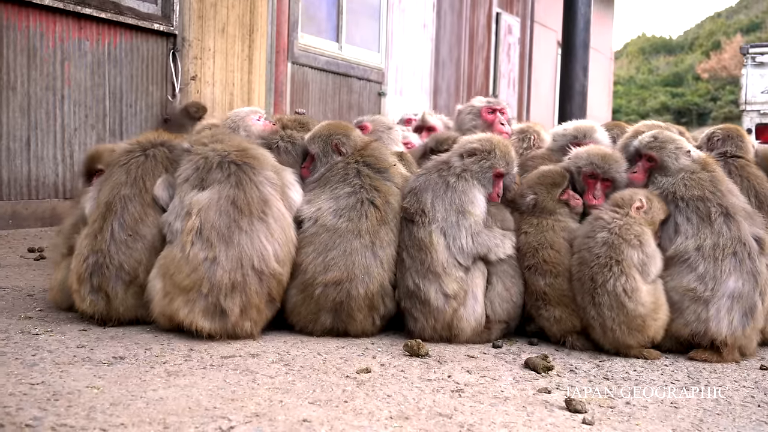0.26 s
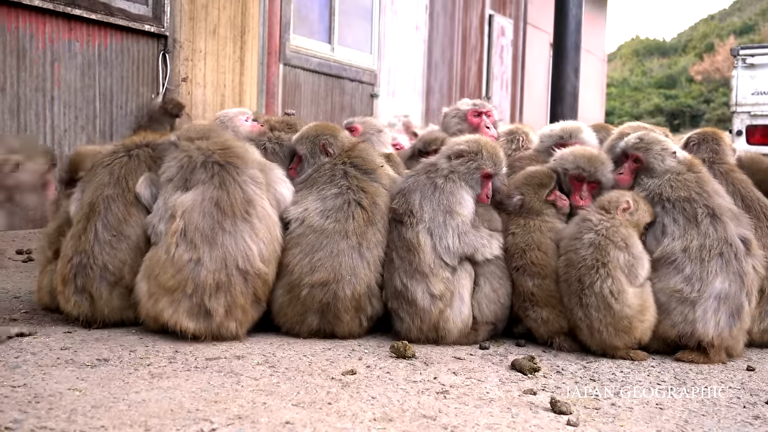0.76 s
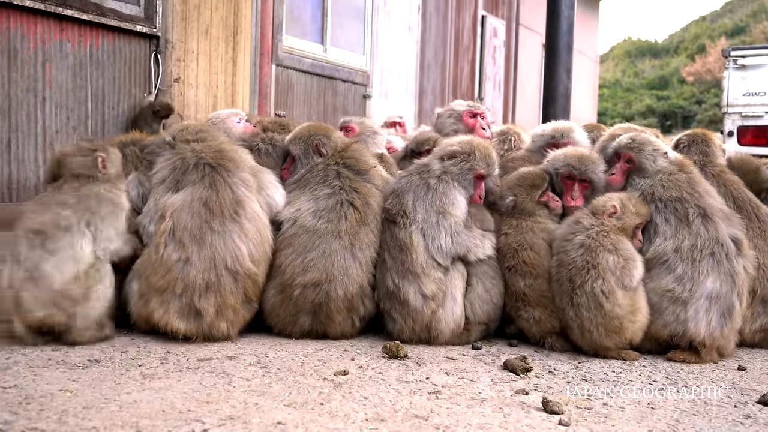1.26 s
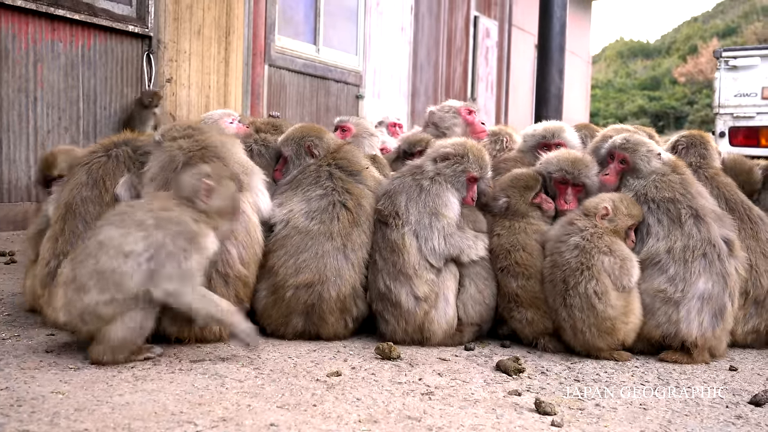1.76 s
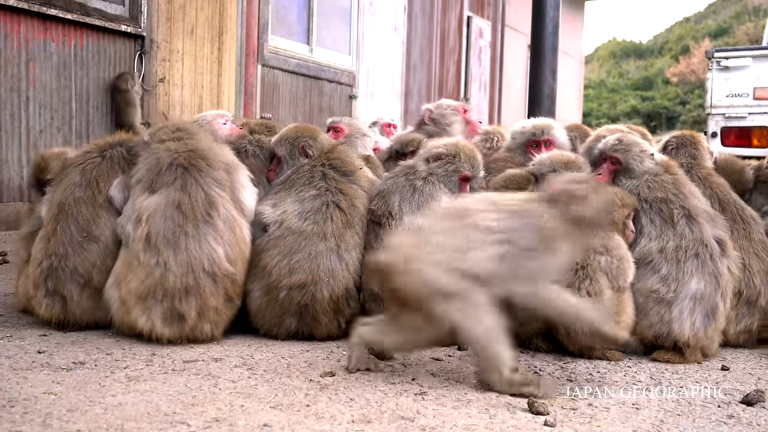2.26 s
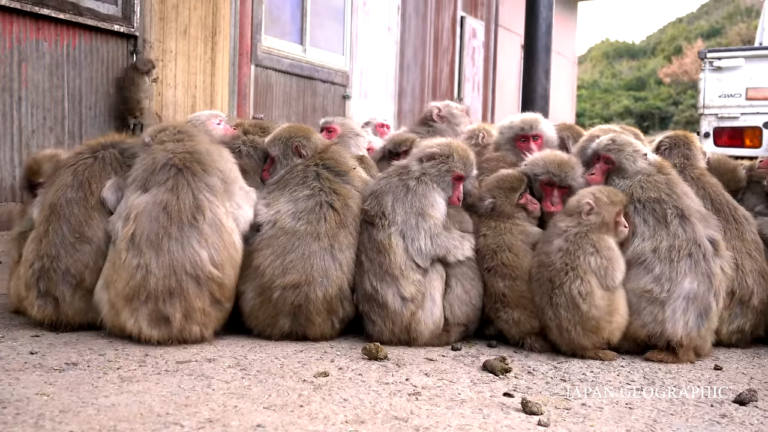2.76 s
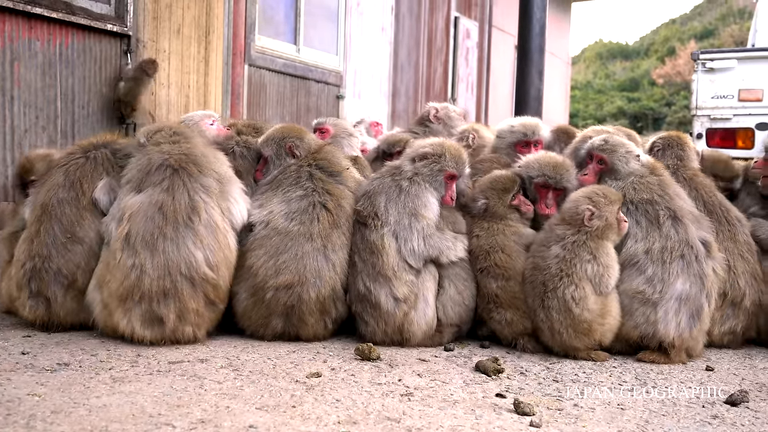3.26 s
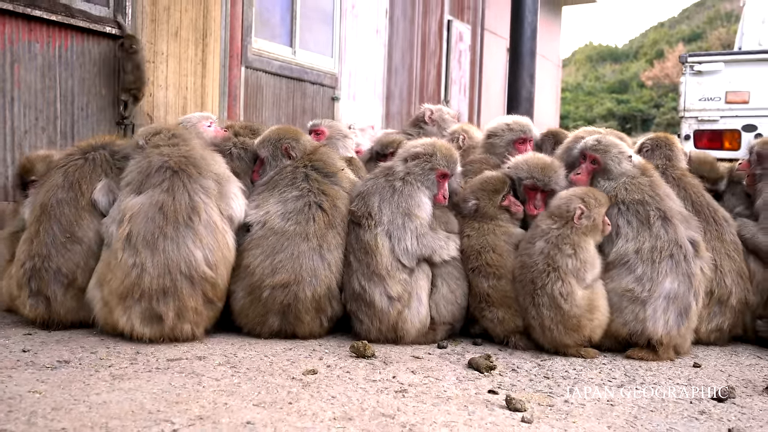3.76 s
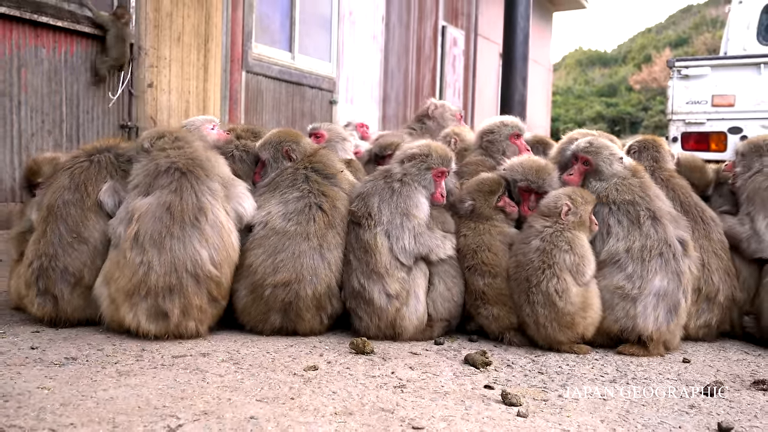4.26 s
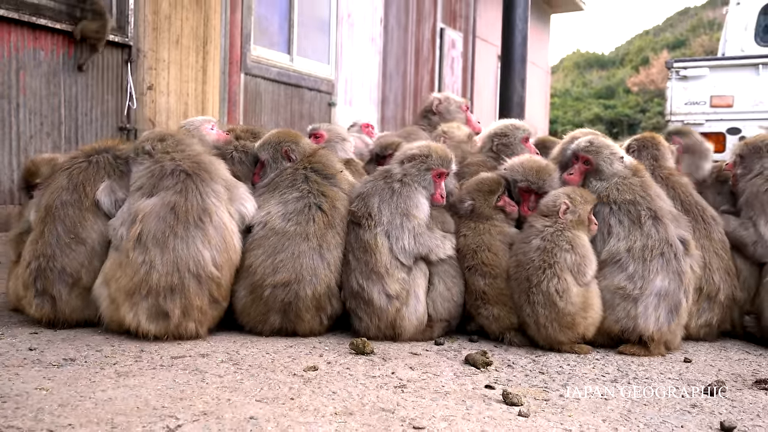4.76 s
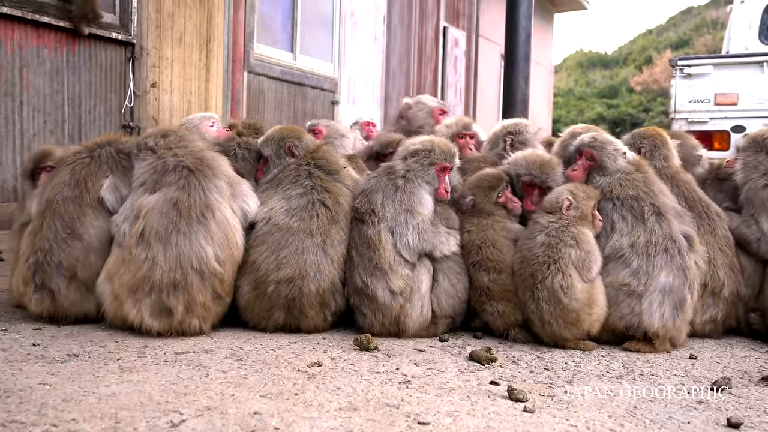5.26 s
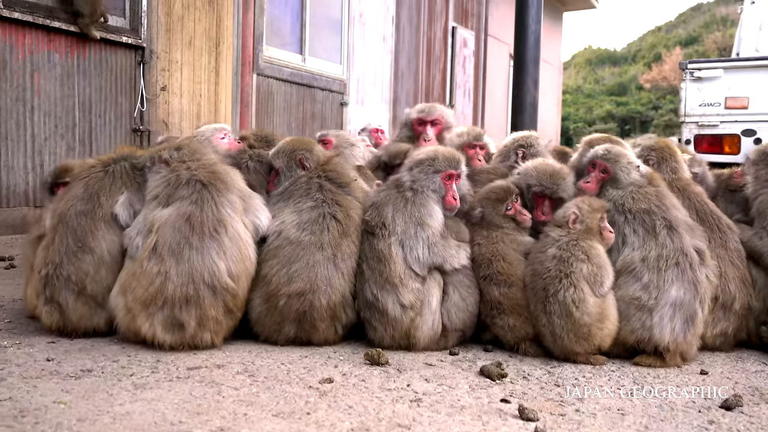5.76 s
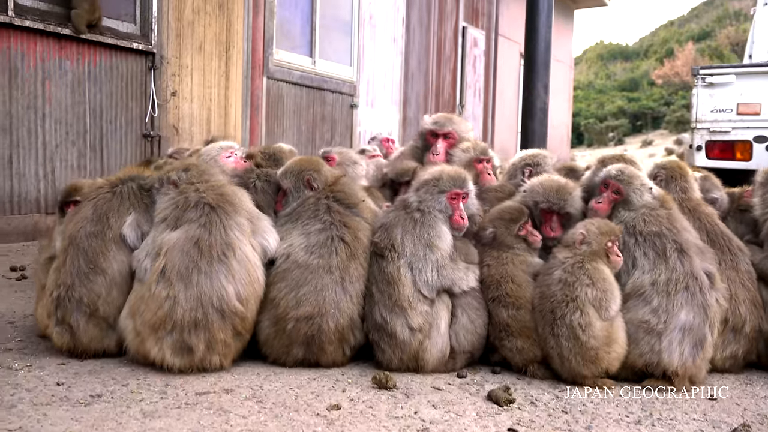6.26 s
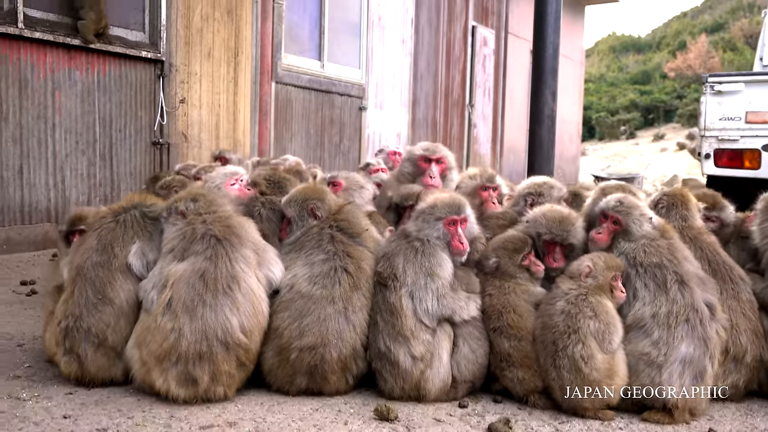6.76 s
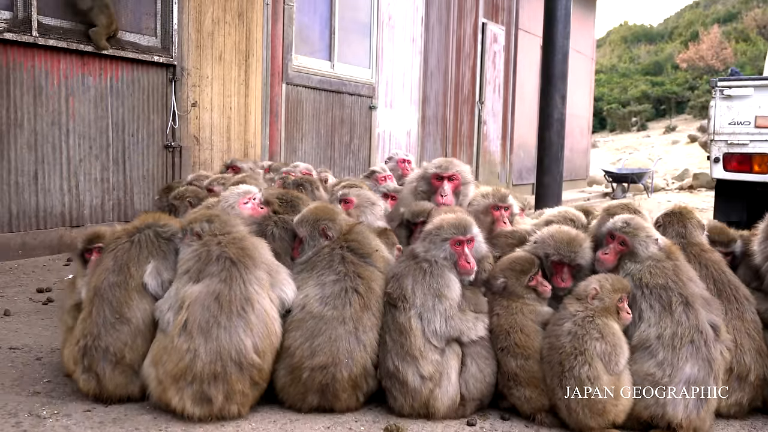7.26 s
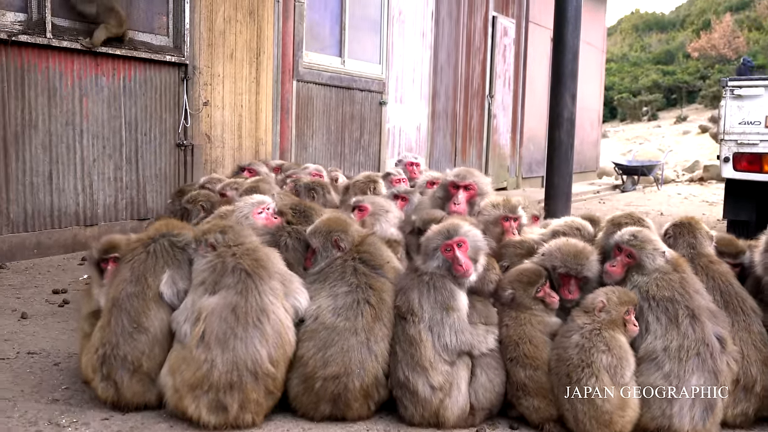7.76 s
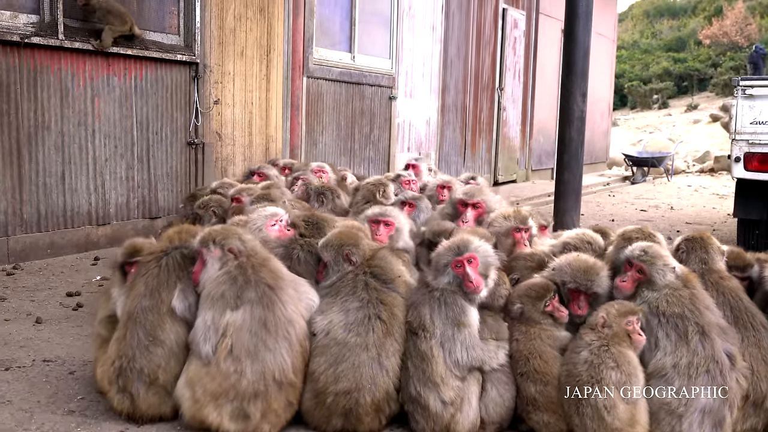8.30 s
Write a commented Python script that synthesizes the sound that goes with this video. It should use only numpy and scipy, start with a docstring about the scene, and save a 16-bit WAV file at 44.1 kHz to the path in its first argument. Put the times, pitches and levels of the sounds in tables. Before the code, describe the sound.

A troop of monkeys gives short high squeaks, chirps, hoarse rasps and a few loud screams outdoors, with two knocks and scattered clicks.

```python
"""On hard ground beside a sheet-metal wall, a huddle of macaques calls a few steps away.
Vibrating vocal folds give high whistles, squeals and screams; slack folds and turbulent breath excite
the mouth's resonances in hoarse rasps. Boards knock twice, feet scuff and gravel ticks.
Wall and yard reflect a short wash, wind rumbles on the two microphone ports,
and the loudest screams overload the input."""
import sys
import numpy as np
from scipy import signal
from scipy.fft import rfft, irfft, next_fast_len
from scipy.io import wavfile

SR = 44100
rng = np.random.default_rng(int(sys.argv[2]) if len(sys.argv) > 2 else 0)


def inscribe(sig):
    """Save sig as 16-bit PCM at rate SR to the path in sys.argv[1].

    A 1-D sig is mono; a 2-D sig holds one channel per row.
    Samples are clipped to [-1, 1] before scaling.
    """
    pcm = np.round(np.clip(np.atleast_2d(sig).T, -1, 1) * 32767)
    wavfile.write(sys.argv[1], SR, pcm.astype(np.int16))


N = 376173

# Irregularity of the vocal folds, by voice name: (roughness [0-1])
ROUGHNESS = {"clear": .1, "husky": .3, "hoarse": .45, "harsh": .62}
# Short calls: (time [s], length [s], first pitch [Hz], last pitch [Hz], fundamental's peak level [dB],
# second partial above the first [dB], fall per further partial [dB], voice)
CHIRPS = [(0, 0.082, 2620, 2562, -27.5, -12, 4, "harsh"), (0.116, 0.031, 1182, 971, -14, -40, 16, "hoarse"),
          (0.702, 0.066, 514, 604, -44, -8, -2, "husky"), (.775, 0.11, 531, 513, -40.5, -13.5, -5, "husky"),
          (0.939, 0.038, 344, 365, -41, 2, 17, "clear"), (1.067, 0.17, 796, 755, -50, -9, 4, "hoarse"),
          (1.274, 0.1, 673, 722, -48, -21, 7, "hoarse"), (1.439, 0.028, 350, 369, -43.5, 3, 8, "clear"),
          (1.703, 0.036, 686, 720, -49, 4, -0.5, "husky"), (1.805, 0.025, 631, 628, -52.5, 7, -3, "husky"),
          (1.927, 0.014, 609, 630, -47.5, 1.5, -2.5, "husky"),
          (2.051, 0.032, 277, 272, -38.5, -20, -2.5, "clear"),
          (2.508, 0.053, 3454, 3310, -26.5, -1.5, 7.5, "husky"),
          (2.584, 0.059, 3980, 4180, -38.5, -5.5, 19, "husky"),
          (2.793, 0.029, 2860, 2550, -17.5, -25.5, 2, "husky"),
          (2.985, 0.038, 1585, 1526, -40, -16, 4, "clear"),
          (3.144, 0.029, 1312, 1036, -25, -10, 1.5, "husky"),
          (3.148, 0.099, 5580, 3550, -25, -13, 19, "harsh"),
          (3.166, 0.055, 3320, 3100, -21.5, -25, 0, "hoarse"),
          (3.257, 0.047, 3730, 3310, -19.5, -9.5, 24, "hoarse"),
          (3.427, 0.039, 3720, 3680, -18, -25, 7, "harsh"),
          (3.637, 0.054, 397, 342.4, -36, -10, -1, "husky"),
          (3.999, 0.028, 1385, 1252, -34, -1, 2.5, "hoarse"),
          (4.189, 0.053, 4610, 4250, -23.5, -3.5, 8, "hoarse"),
          (4.433, 0.058, 4420, 4130, -29, -4.5, 4, "hoarse"),
          (5.201, 0.032, 1412, 1044, -41.5, 5, 19, "harsh"),
          (5.592, 0.042, 2320, 1810, -37, -13, 2, "husky"),
          (5.788, 0.023, 2002, 1828, -8.5, -5, 13.5, "husky"),
          (5.825, 0.049, 3215, 3355, -9, -29, 7, "harsh"),
          (6.829, 0.041, 1686, 1625, -45, 22.5, 31, "clear"),
          (6.927, 0.068, 4900, 4720, -39, 8.5, 4, "hoarse"),
          (7.007, 0.018, 2450, 3220, -15, -17, 29, "clear"),
          (7.036, 0.042, 1924, 940, -16.5, -1, 3, "harsh"),
          (7.839, 0.057, 1425, 1520, -43.5, -1, 12.5, "clear"),
          (8.246, 0.054, 1399, 934, -16.5, -2.5, 2.5, "harsh")]
# Long calls: (voice, clean start [s], second partial above the first [dB], fall per further partial [dB],
# contour of (time [s], pitch [Hz], fundamental's level [dB]))
SQUEALS = [ ("husky", 0, -6.5, 1.4, [(3.497, 4400, -25.5), (3.528, 4520, -18), (3.538, 4330, -22),
           (3.55, 4630, -15.5), (3.586, 4630, -22), (3.596, 5040, -19)]),
           ("husky", 0, -2.5, 5.8, [(3.735, 4620, -26), (3.76, 4870, -21), (3.79, 4760, -24),
           (3.82, 4510, -23), (3.85, 4690, -31), (3.895, 4660, -33), (3.93, 4830, -33),
           (3.965, 4680, -33.5), (4.01, 4370, -25.5), (4.04, 4280, -27)]),
           ("harsh", 0, -14.5, 6.9, [(4.599, 4060, -37), (4.615, 3450, -24.5), (4.665, 3350, -30.5)]),
           ("harsh", 0, -13, 7.1, [(4.703, 4200, -35), (4.72, 3500, -22), (4.745, 3250, -30)]),
           ("hoarse", 0, -19, 9, [(5.808, 2147, -1), (5.83, 2315, -6), (5.87, 2372, -1.5),
           (5.897, 2083, -8.5), (5.93, 2330, -5.5)]), ("hoarse", .09, -14, 1, [(6.212, 2393, -15),
           (6.23, 2300, -6), (6.278, 2355, 2.5), (6.3, 2770, -7), (6.312, 3260, -12), (6.35, 3330, -14),
           (6.385, 2932, -25), (6.41, 2780, -21), (6.427, 2572, -18), (6.446, 2920, -18.5),
           (6.462, 3250, -20), (6.482, 3130, -18), (6.502, 2850, -22), (6.52, 2375, -13),
           (6.527, 1970, -20.5), (6.535, 990, -30)]), ("hoarse", .012, -17, 13, [(7.022, 2838, -9.5),
           (7.04, 2730, -10), (7.067, 2045, -14.5), (7.086, 2180, -10)]),
           ("clear", 0, -18.5, 3.2, [(7.898, 1515, -38), (8.04, 1560, -30.5), (8.2, 1508, -31),
           (8.36, 1423, -32.5), (8.42, 1323, -23), (8.47, 1343, -35.5), (8.51, 1255, -32)]),
           ("hoarse", 0.029, -20, 6.8, [(8.204, 1900, -10), (8.212, 2112, -11.5), (8.232, 2012, -6),
           (8.26, 2060, -7), (8.29, 1684, -8)])]
def voices():
    """Periodic fold vibration gives a harmonic series; irregularity modulates pitch and amplitude."""
    tear_s, clean_share, torn_loss_db, top_fall_db = .01, .6, 6, 4
    out = np.zeros(N)
    flutter = wobble(250)
    quaver = wobble(152) + 0.605 * wobble(26.6)
    waver_db = 5 * wobble(30)
    chirps = [(voice, 0, second, fall, chirp_contour(*shape)) for *shape, second, fall, voice in CHIRPS]
    for voice, clean_s, second_above_db, fall_db, contour in chirps + SQUEALS:
        start, end = contour[0][0], contour[-1][0]
        t = np.arange(round((end - start) * SR)) / SR
        at = (start * SR + np.arange(len(t))).astype(int) % N
        torn = np.clip(1 + (t - clean_s) / tear_s, 0, 1)   # a clean start tears into roughness
        rough = ROUGHNESS[voice] * np.clip(t / .08, .6, 1) * np.maximum(torn, clean_share)
        pitch, first_db = curve(contour, t + start)
        second_db = first_db + second_above_db - torn_loss_db * (torn - torn[0])
        phase = 2 * np.pi * np.cumsum(pitch * (1 + .042 * rough * quaver[at])) / SR
        call = from_db(first_db) * np.sin(phase)
        for k in range(2, 9):   # each upper partial wavers on its own
            partial_db = second_db - fall_db * (k - 2) - top_fall_db * max(k - 3, 0)
            gain = from_db(partial_db + np.sqrt(rough) * waver_db[at - 3000 * k])
            jitter = .7 * k * rough * flutter[at - 50 * k]
            call += gain * np.sin(k * phase + jitter) * (k * pitch < .42 * SR)
        shimmer = np.sqrt(1 - rough ** 2) + rough * flutter[at]
        add(out, np.sqrt(2) * call * shimmer * edges(t, rise_s=0.0012, fall_s=0.0028), start)
    return out


def chirp_contour(start, length, first_hz, last_hz, peak_db):
    """Frequency glide under a parabolic swell: rows of (time [s], pitch [Hz], level [dB])."""
    progress, loudest_at = np.linspace(0, 1, num=9), 0.72
    pitch = last_hz + (first_hz - last_hz) * (1 - progress) ** 1.2
    level_db = peak_db - (2 * (progress - loudest_at)) ** 2
    return np.transpose([start + length * progress, pitch, level_db])


# Hoarse breaths: (time [s], hold [s], mouth resonance [Hz], level [dB], hiss relative to mouth [dB])
RASPS = [(0, 0.029, 2820, -17.5, -42), (0.119, 0.019, 1370, -17.5, -32), (0.305, 0.085, 3520, -25.5, -8.5),
         (0.597, 0.031, 3490, -25, -5), (0.702, 0.22, 3600, -29.5, -1.5), (1.063, 0.25, 3770, -24, -4),
         (1.318, 0.075, 3630, -26, -7.5), (1.693, 0.033, 3650, -40.5, -3.5), (1.802, 0.013, 3360, -34.5, 0),
         (1.922, 0.013, 3000, -33, -9), (2.516, 0.055, 3420, -24.5, -5), (2.858, 0.057, 3660, -29, -3.5),
         (2.952, 0.049, 3670, -28, -5.5), (3.165, 0.035, 3240, -18.5, -2), (3.26, 0.033, 3160, -25, -22),
         (3.397, 0.048, 3570, -24, -3), (3.495, 0.15, 3710, -25.5, -4.5), (3.683, 0.15, 3630, -27, 0),
         (3.851, 0.088, 3750, -30, -18), (4.159, 0.099, 3760, -31, -11), (4.336, 0.15, 3540, -30, -5),
         (4.591, 0.032, 3540, -32.5, -8), (4.705, 0.045, 3320, -31.5, -11), (4.944, 0.0089, 3330, -51, 5),
         (5.198, 0.03, 2620, -39.5, 3.5), (5.584, 0.053, 3350, -24, -0.5), (5.711, 0.061, 3450, -27, -5),
         (5.8, 0.12, 2210, -13.5, -29.5), (5.977, 0.053, 3250, -26, -5), (6.306, 0.051, 2950, -12.5, -5.5),
         (6.443, 0.032, 2630, -17.5, -12.5), (6.709, 0.0053, 3200, -31, -2.5),
         (6.818, 0.053, 3130, -37, 10.5), (6.992, 0.026, 3160, -21.5, -6),
         (7.027, 0.041, 3960, -16.5, -11.5), (7.72, 0.022, 3200, -26.5, -2.5),
         (7.898, 0.053, 3100, -29.5, -1), (8.016, 0.028, 3280, -32.5, 1.5), (8.122, 0.03, 3200, -30, -3),
         (8.227, 0.011, 1650, -2, -48), (8.234, 0.076, 3300, -18, -25)]
def rasps():
    """Source and filter: uneven slaps of slack folds, and the air between them, ring the mouth."""
    slap_hz = 580
    out = np.zeros(N)
    tension_db = wobble(4)
    slaps = pulses(slap_hz * from_db(tension_db + 1.5 * wobble(400))) * from_db(rng.standard_normal(N))
    puffs = passed(slaps, 480, "low", order=1)   # air escapes just after each slap
    air = 0.4 * rms_one(slaps) + rms_one(rng.standard_normal(N) * (puffs + 0.8 * puffs.mean()))
    hiss = teeth_hiss(slaps)
    beats = pulses(slap_hz * from_db(tension_db + 0.54 * wobble(150)))   # a steadier chest voice
    grunt = from_db(-44.5) * rms_one(passed(beats, [450, 2200], "band"))
    waver = from_db(1.5 * wobble(25))
    sides_db = -9 + 2.5 * np.array([wobble(12), wobble(12)])   # the lips vary two side resonances
    shifts = rng.uniform(.95, 1.05, len(RASPS))
    for shift, (start, held, hz, level_db, hiss_db) in zip(shifts, RASPS):
        length = held + 0.13
        first, size = round(start * SR), round(length * SR)
        t, span = np.arange(size) / SR, slice(first, first + size)
        breath = air[span]
        opening, closing = resonance(breath, 0.99 * hz, 170), resonance(breath, shift * hz, 260)
        formant = opening + (closing - opening) * t / length   # shifts as the mouth moves
        sides = sum(from_db(side_db[span]) * resonance(breath, ratio * hz, width_hz=300)
                    for side_db, ratio in zip(sides_db, (.87, 1.2)))
        mouth = rms_one(passed(formant + sides, 0.8 * hz, "high", order=3))
        effort = from_db(level_db + rasp_effort_db(t, held)) * waver[span]
        chest = grunt[span] * decay(t, t60_s=.5)
        rasp = effort * (mouth + from_db(hiss_db) * hiss[span]) + chest
        add(out, rasp * edges(t, rise_s=0.0046, fall_s=0.11), start)
    return out


def teeth_hiss(slaps):
    """Turbulence: a jet at the teeth is filtered by hollows of the mouth that open and close."""
    jet = rng.standard_normal(N) + .5 * rms_one(slaps)
    treble = passed(jet, 4300, "high") + .7 * passed(jet, [7000, 14000], "band")
    hiss = rms_one(treble + .7 * resonance(jet, 4700, width_hz=1800))
    hollows_hz = np.geomspace(2900, 15000, num=11)
    return rms_one(sum((-1) ** k * resonance(hiss, hz, hz / 7) * from_db(2.5 * wobble(9))
                       for k, hz in enumerate(hollows_hz)))


def rasp_effort_db(t, held):
    """Amplitude envelope of a breath: a short swell, a slow sag, a quick release after the hold."""
    swell_db, swell_s, sag_db_per_s, release_db_per_s = 5, 0.041, 51.5, 401
    onset_db = swell_db * (np.clip(t / swell_s, 0, 1) - 1)
    return onset_db - sag_db_per_s * t - release_db_per_s * np.maximum(t - held, 0)


# Blows on loose boards: (time [s], level [dB], board resonance [Hz], relative crack level [dB])
KNOCKS = [(2.301, -18, 660, -32), (2.731, -13, 1460, -16.5)]
def knocks():
    """Impact excitation: a sharp crack, and a damped rattle around the board's resonance."""
    out, t = np.zeros(N), np.arange(SR // 4) / SR
    for start, level_db, hz, crack_db in KNOCKS:
        board = rms_one(resonance(grains(len(t), spread_db=10.4), hz, width_hz=hz))
        rattle = passed(board, 3 * hz, "low") * decay(t, t60_s=0.11)
        crack = passed(rng.standard_normal(len(t)), 1500, "high") * decay(t, t60_s=0.18)
        add(out, from_db(level_db) * (rattle + from_db(crack_db) * crack), start)
    return out


# Feet on the ground: (time [s], relative level [dB])
SCUFFS = [(3.45, -52), (3.559, -42), (3.739, -44.5), (4.155, -42), (4.205, -37), (4.399, -32.5),
          (4.455, -30.5), (4.609, -31), (5.21, -41.5), (5.43, -41)]
def scuffs():
    """Friction: feet sliding on grit make dull, quickly decaying bursts of noise."""
    out, t = np.zeros(N), np.arange(SR // 8) / SR
    for start, level_db in SCUFFS:
        grit = rms_one(passed(grains(len(t), spread_db=4), [350, 1600], "band"))
        scrape = grit * decay(t, t60_s=0.2) * edges(t, rise_s=0.00064, fall_s=0.0084)
        add(out, from_db(level_db + 4.5) * scrape, start)
    return out


# The clearest ticks of gravel: (time [s], relative level [dB])
GRAVEL_TICKS = [(.537, -23), (2.668, -34), (3.1043, -22.5), (4.893, -21.5), (5.096, -24), (5.435, -24),
                (7.1897, -47)]
def gravel():
    """Small impacts, each crumbling briefly: a few clear ticks over a Poisson process of faint ones."""
    t, ticks_per_s = np.arange(SR // 8) / SR, 9
    strikes = rng.random(N) < ticks_per_s / SR
    ticks = strikes * from_db(-46 + 4 * np.minimum(rng.exponential(1, N), 3))
    crunch = from_db(-12) * rng.standard_normal(len(t)) * decay(t, t60_s=.03)
    for start, level_db in GRAVEL_TICKS:
        ticks[round(start * SR)] = from_db(level_db)
    return passed(signal.fftconvolve(ticks, crunch)[:N], [1500, 12000], "band")


def port_scatter(x):
    """Scattering: bodies and ground send the treble differently to two spaced microphone ports."""
    t = np.arange(SR // 8) / SR
    scatter = passed(rng.standard_normal(len(t)), 3500, "high") * decay(t, t60_s=.15)
    side = from_db(-5.5) * signal.fftconvolve(x, scatter / np.sqrt(np.sum(scatter ** 2)))[:N]
    return x + side * [[1], [-1]]


def wall_echoes(x):
    """Reverberation: diffuse reflections from wall, ground and sheds, the treble dying first."""
    split_hz, delay_s = 5140, .008
    t = np.arange(SR * 3 // 4) / SR
    noise = rng.standard_normal((2, len(t)))
    noise = 0.65 * noise[0] + 0.75 * noise   # partly shared by both ports
    low = passed(noise, split_hz, "low") * decay(t, t60_s=0.36)
    high = passed(noise, split_hz, "high") * decay(t, t60_s=0.34)
    echoes = (low + 0.69 * high) * np.clip((t - delay_s) / 0.0023, 0, 1)
    echoes /= np.sqrt(np.sum(low ** 2, axis=1, keepdims=True))
    return from_db(-8.5) * signal.fftconvolve(x[None], echoes, axes=1)[:, :N]


# Strength of the wind: (time [s], relative level [dB])
GUSTS = [(0.0, -44.5), (2.52, -46.5), (4.59, -39.5), (7.98, -47.5), (8.53, -46.5)]
def wind():
    """Turbulent pressure: gusts make a lumpy rumble, mostly independent at each port."""
    gust_db, port_db = curve(GUSTS, np.arange(N) / SR)[0], [[4], [6]]
    noise = rng.standard_normal((3, N))
    pressure = passed(noise[1:] + 0.5 * noise[0], 33, "low", order=1)
    rumble = passed(passed(pressure, 35, "high"), 295, "low")
    lumps = from_db(1.4 * np.array([wobble(7.3), wobble(18)]))
    return from_db(gust_db + port_db) * rms_one(rumble * lumps)


# Spectrum of the distant air: (frequency [Hz], relative spectral density [dB])
AIR_SPECTRUM = [(100, -27.5), (250, 0), (1000, -7), (2500, -14.5), (6300, -20), (13000, -26.5)]
def yard_air():
    """Ambient noise, half coherent between the ports; its low rustle grows with the gusts."""
    size = next_fast_len(N)
    hz = np.maximum(np.arange(size // 2 + 1) * SR / size, 1)
    band_hz, band_db = np.transpose(AIR_SPECTRUM)
    shape = from_db(np.interp(np.log(hz), np.log(band_hz), band_db))
    noise = irfft(rfft(rng.standard_normal((3, size))) * shape, size)[:, :N]
    air = from_db(-47) * rms_one(noise[0] + 0.94 * noise[1:])
    gust_db = curve(GUSTS, np.arange(N) / SR)[0]
    rustle_db = (gust_db - gust_db.mean()) / 2 + 4.1 * wobble(7.7)
    return air + passed(air, 1500, "low", order=1) * (from_db(rustle_db) - 1)


def from_db(db):
    """Amplitude ratio of a level in decibels."""
    return 10 ** (np.asarray(db) / 20)


def decay(t, t60_s):
    """Exponential damping by 60 dB in t60_s."""
    return from_db(-60 * t / t60_s)


def edges(t, rise_s, fall_s):
    """Linear attack and release."""
    return np.clip(t / rise_s, 0, 1) * np.clip((t[-1] - t) / fall_s, 0, 1)


def rms_one(x):
    """Normalisation to unit rms."""
    return x / np.sqrt(np.mean(x ** 2) + 1e-20)


def curve(rows, t):
    """Linear interpolation of a table's columns at the times t."""
    times, *columns = np.transpose(rows)
    return [np.interp(t, times, column) for column in columns]


def passed(x, hz, kind, order=2):
    """Butterworth filter."""
    return signal.sosfilt(signal.butter(order, hz, kind, fs=SR, output="sos"), x)


def resonance(x, hz, width_hz):
    """Two-pole resonator with unit peak gain."""
    r = np.exp(-np.pi * width_hz / SR)
    poles = [1, -2 * r * np.cos(2 * np.pi * hz / SR), r * r]
    return signal.lfilter(np.array([1, 0, -1]) * (1 - r * r) / 2, poles, x)


def wobble(hz):
    """Random modulation: low-passed noise of unit rms."""
    return rms_one(passed(rng.standard_normal(N + SR), hz, "low")[SR:])


def pulses(hz):
    """Impulse train: one pulse per cycle of a varying frequency."""
    return np.diff(np.floor(np.cumsum(hz / SR)), prepend=0)


def grains(size, spread_db):
    """Noise made grainy by log-normal amplitudes."""
    return rng.standard_normal(size) * from_db(spread_db * rng.standard_normal(size))


def add(out, x, start_s):
    """Superposition of x on out from start_s."""
    i = max(round(start_s * SR), 0)
    out[i:i + len(x)] += x[:N - i]


# Direction of the callers: (time [s], left minus right level [dB])
BALANCE = [(.05, 0.5), (.35, -3), (2.3, -3), (2.75, -2), (3.2, -0.5), (4.3, -2), (5.65, -1), (5.85, 3),
           (6.87, 0.5), (7.05, 1), (8.1, -1), (8.25, 1)]
def scene():
    """A level difference between the ports places the troop and its echoes amid air and wind."""
    troop = voices() + rasps() + knocks() + scuffs() + gravel()
    lean_db = curve(BALANCE, np.arange(N) / SR)[0] / 2
    placed = (port_scatter(troop) + wall_echoes(troop)) * from_db([lean_db, -lean_db])
    return placed + yard_air() + wind()


def record(dry):
    """Overload: the input clips hard, and a steep low-pass removes the highest treble."""
    low_pass = signal.cheby2(20, 60, 15860, fs=SR, output="sos")
    return np.clip(signal.sosfilt(low_pass, np.clip(dry, -1, 1)), -1, 1)


dry = scene()
out = record(dry)
inscribe(out)
```